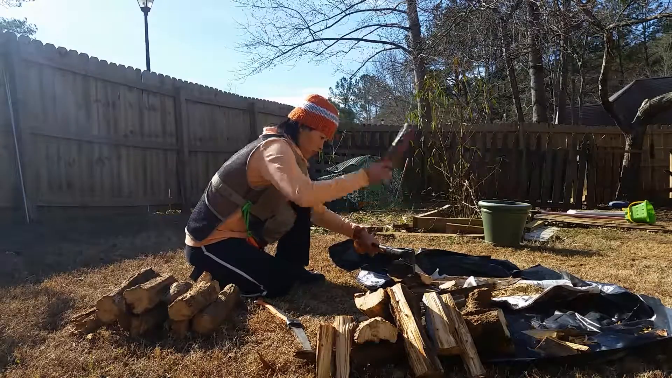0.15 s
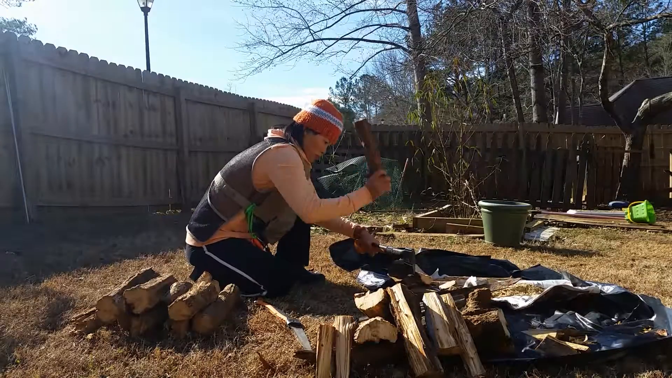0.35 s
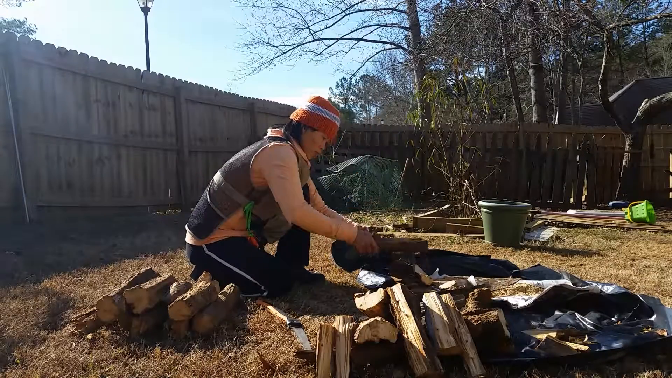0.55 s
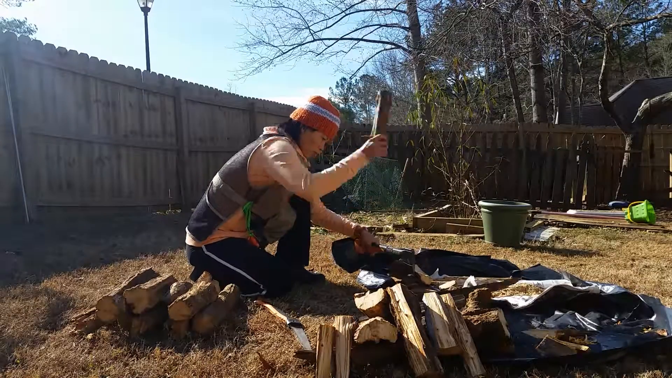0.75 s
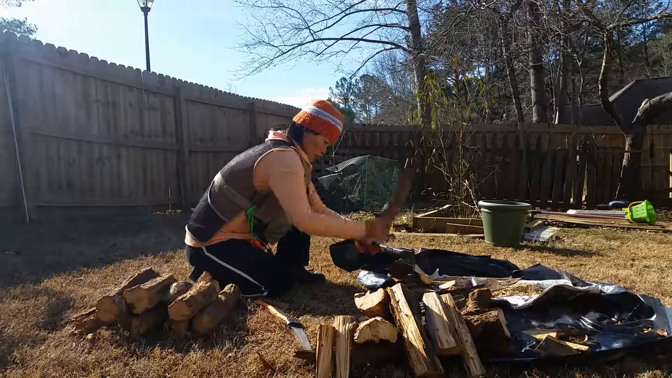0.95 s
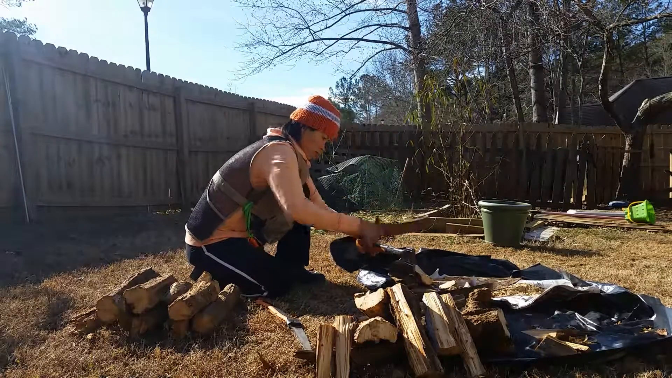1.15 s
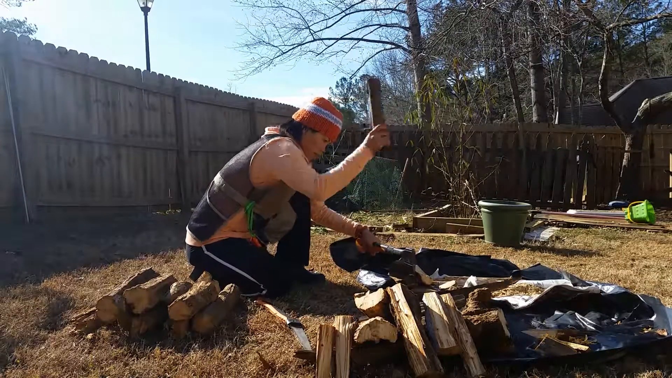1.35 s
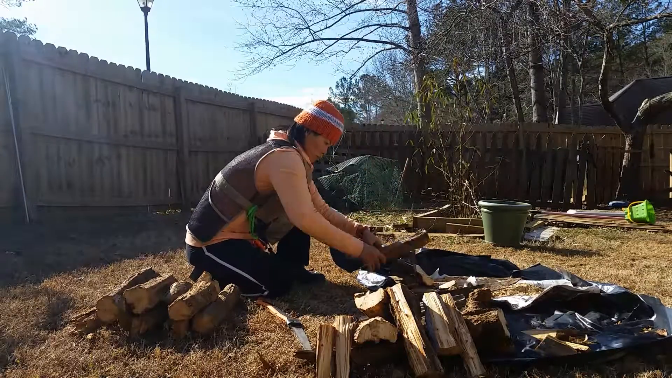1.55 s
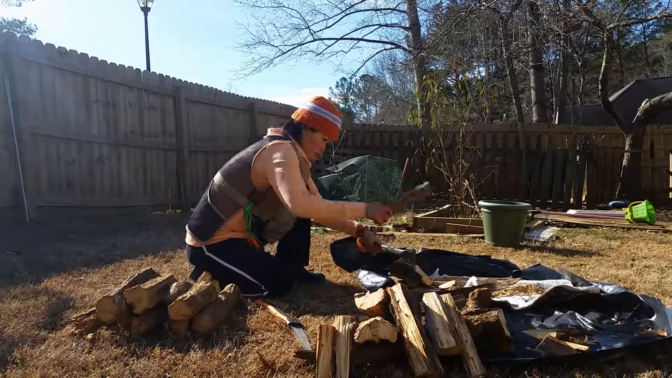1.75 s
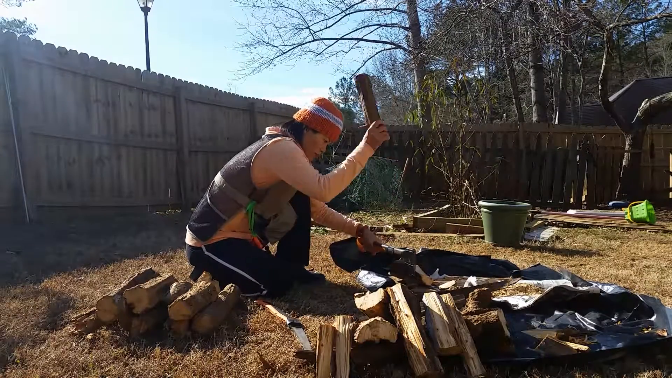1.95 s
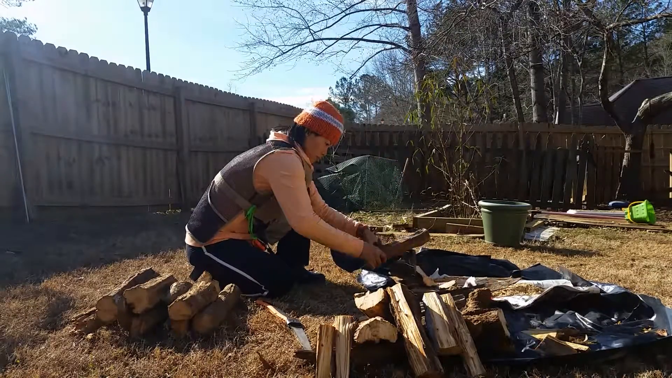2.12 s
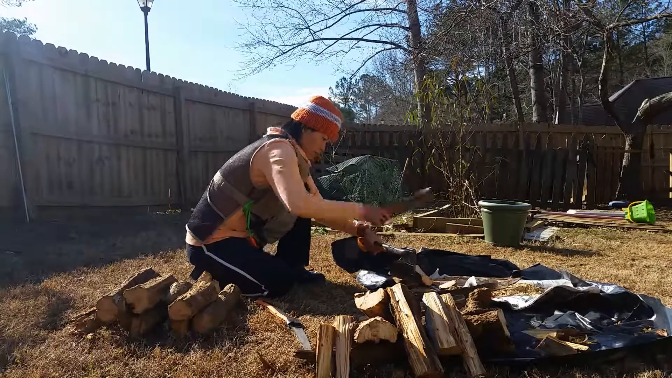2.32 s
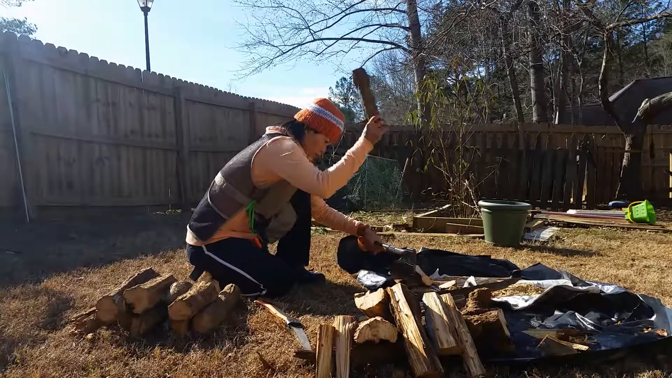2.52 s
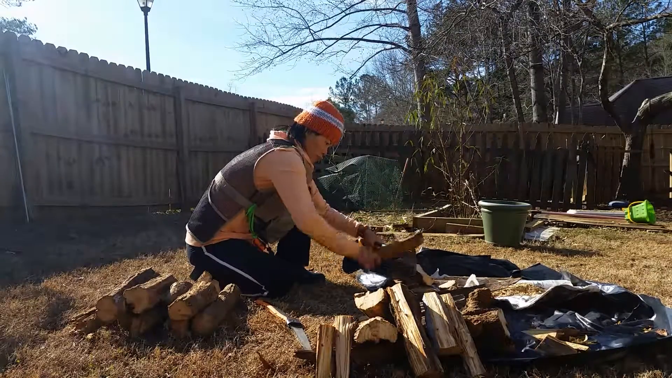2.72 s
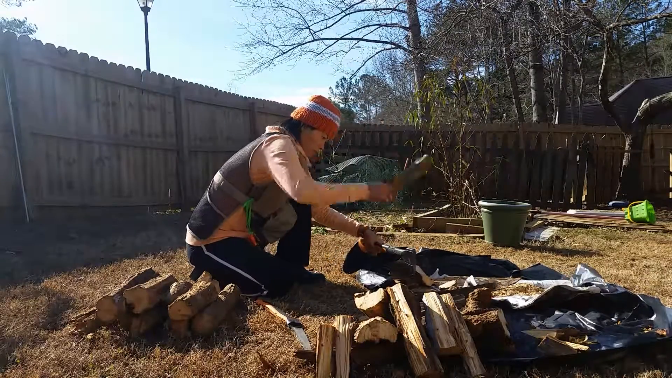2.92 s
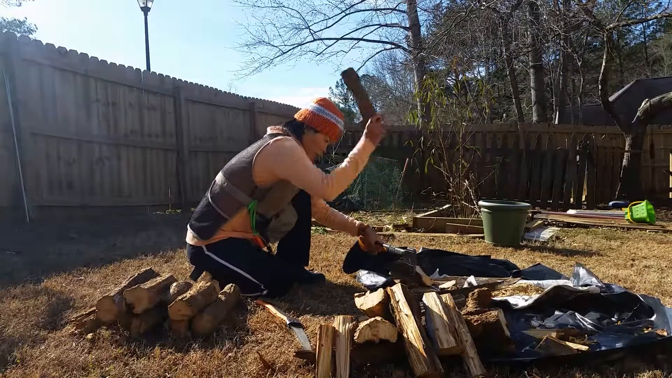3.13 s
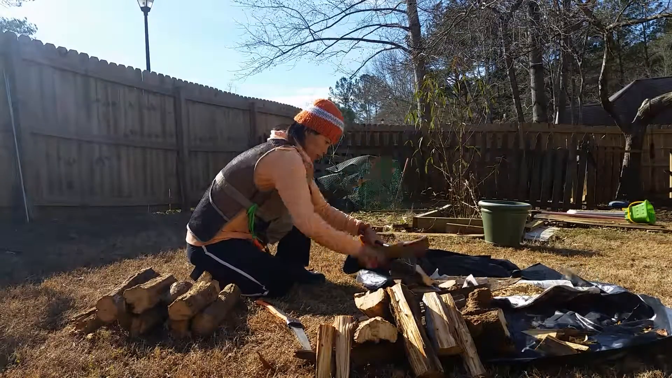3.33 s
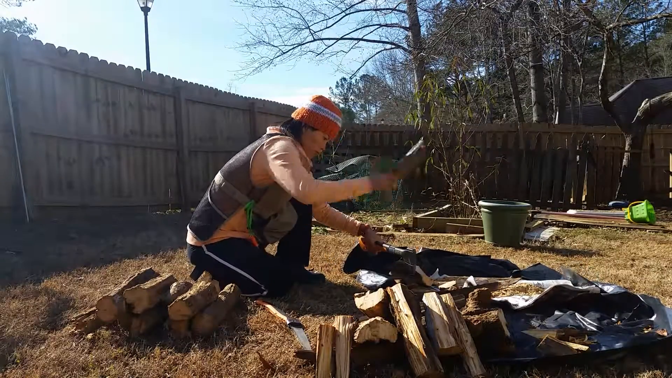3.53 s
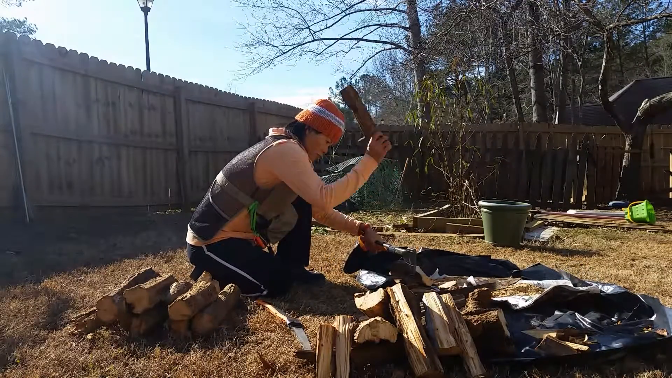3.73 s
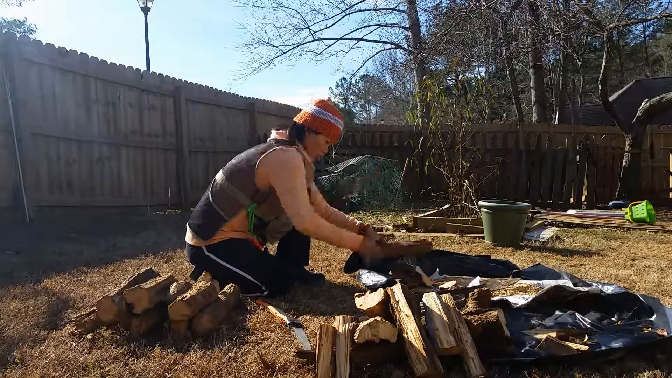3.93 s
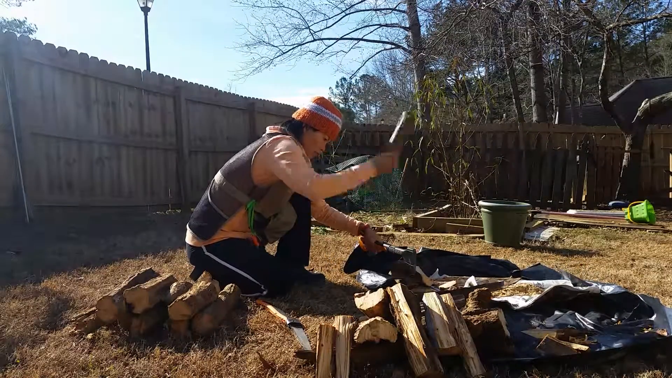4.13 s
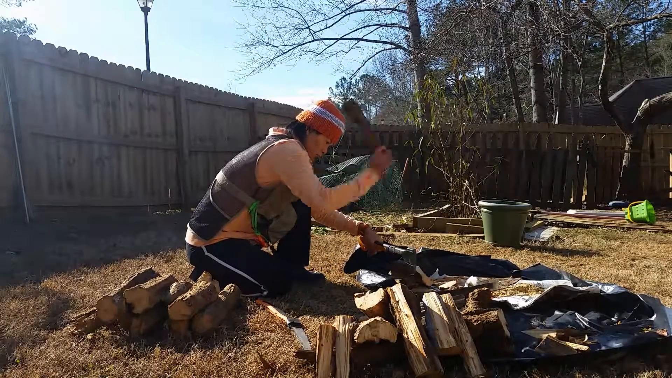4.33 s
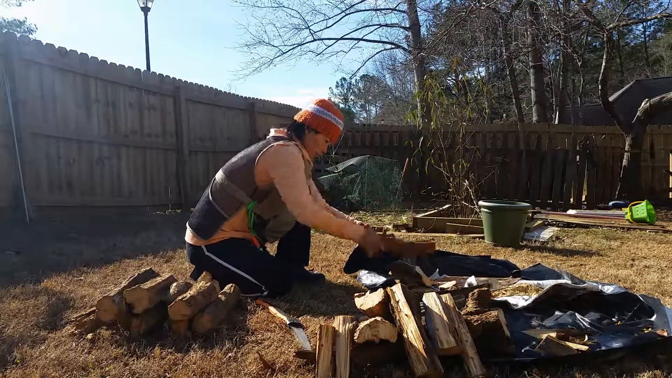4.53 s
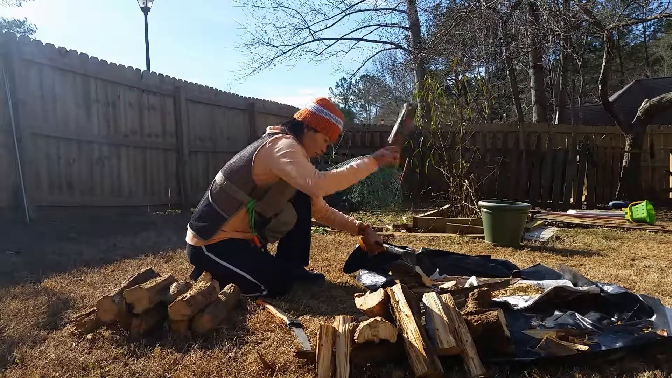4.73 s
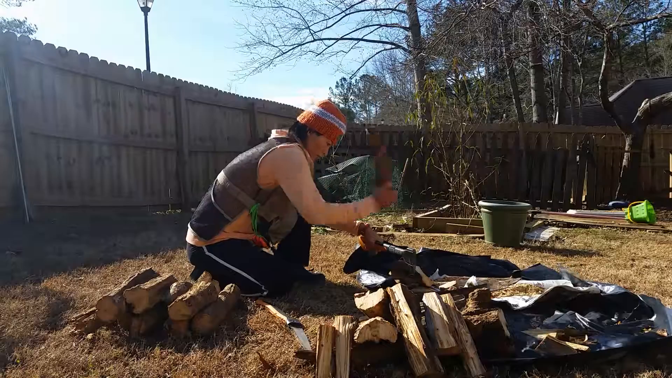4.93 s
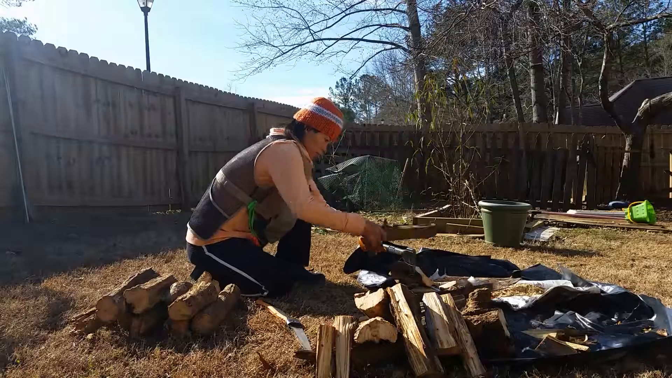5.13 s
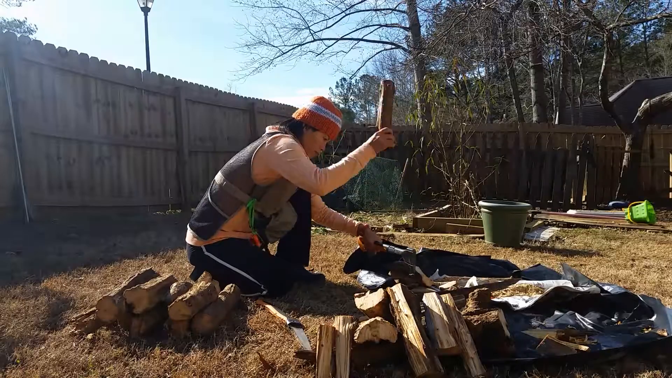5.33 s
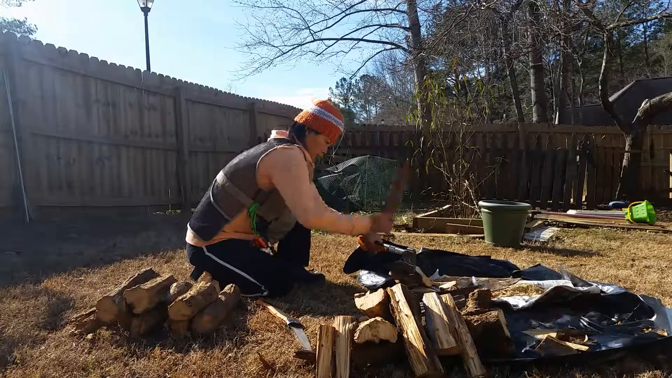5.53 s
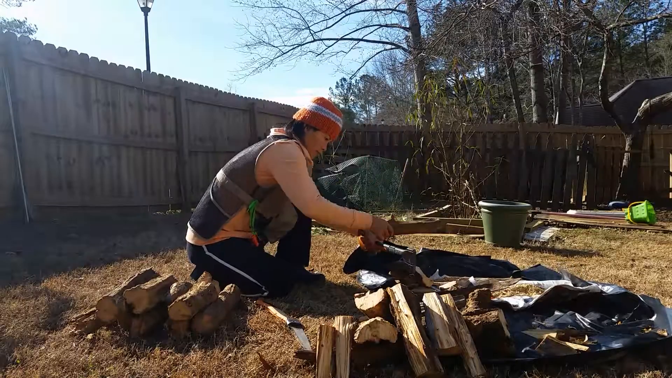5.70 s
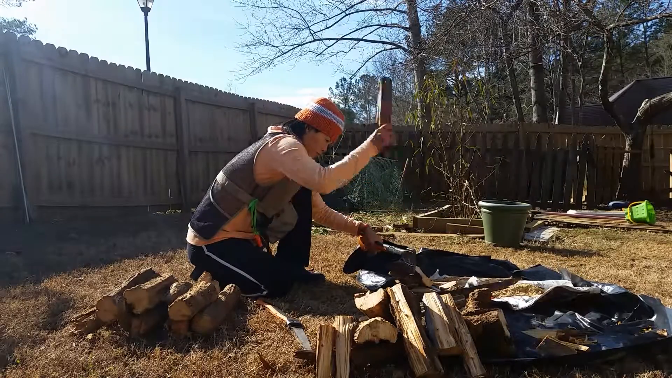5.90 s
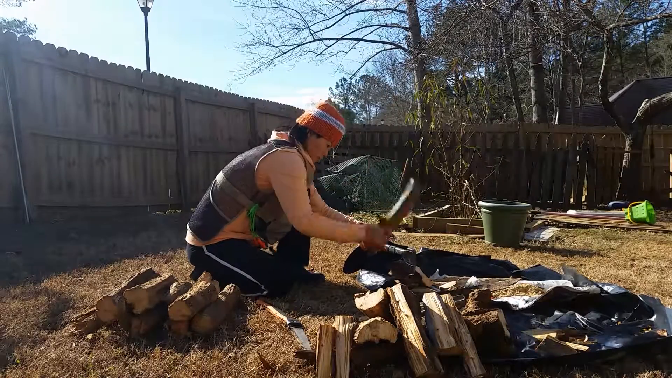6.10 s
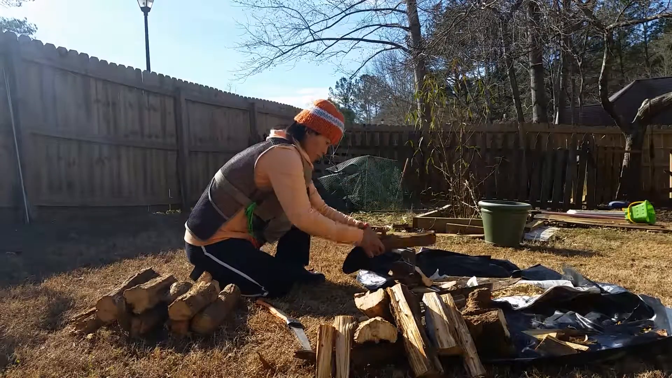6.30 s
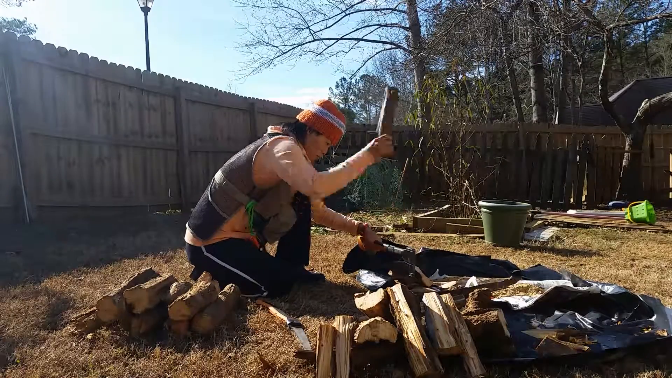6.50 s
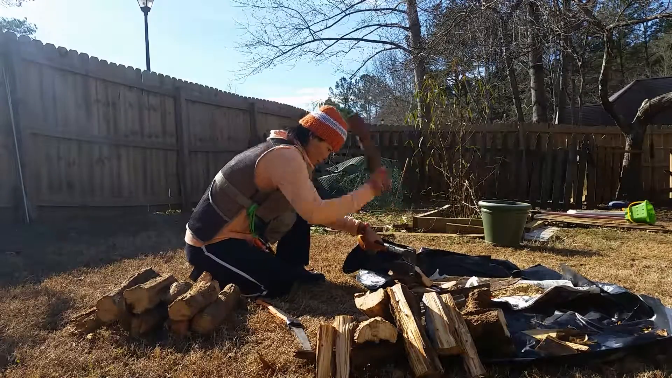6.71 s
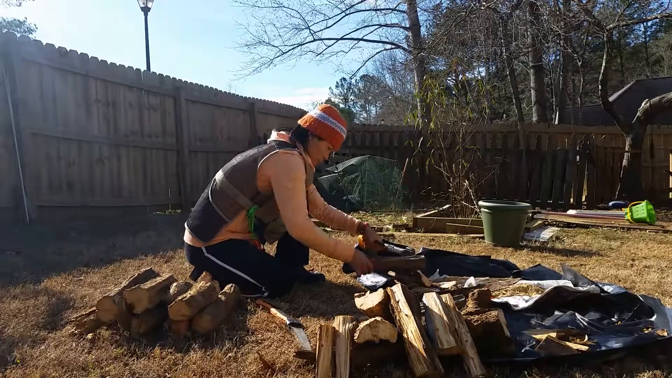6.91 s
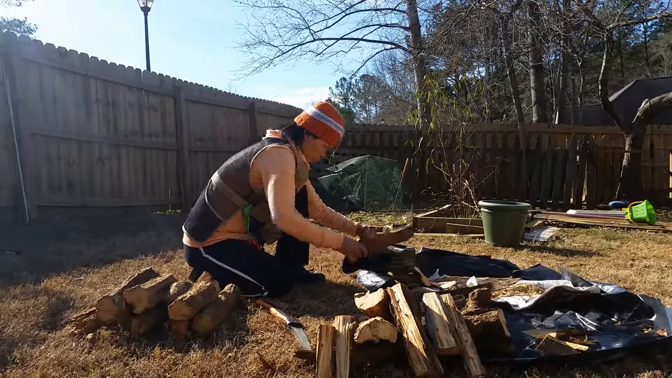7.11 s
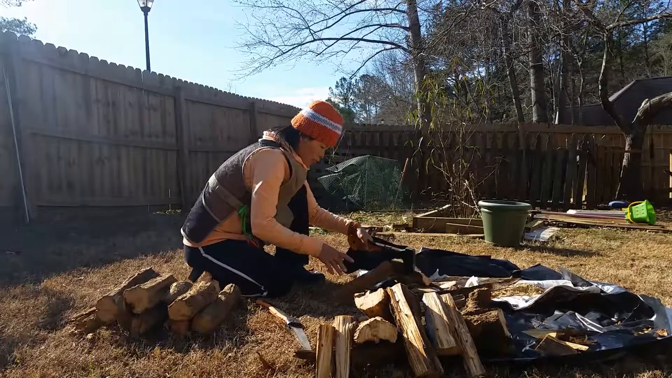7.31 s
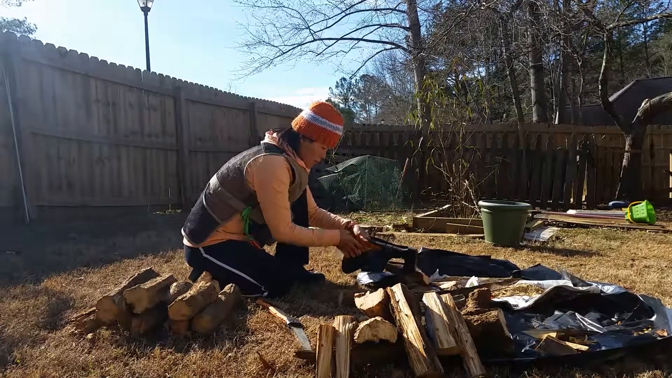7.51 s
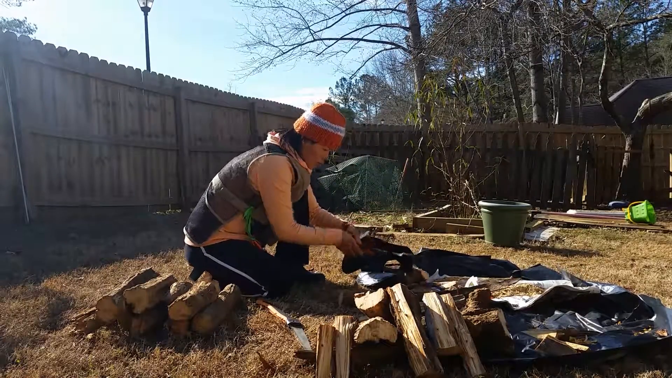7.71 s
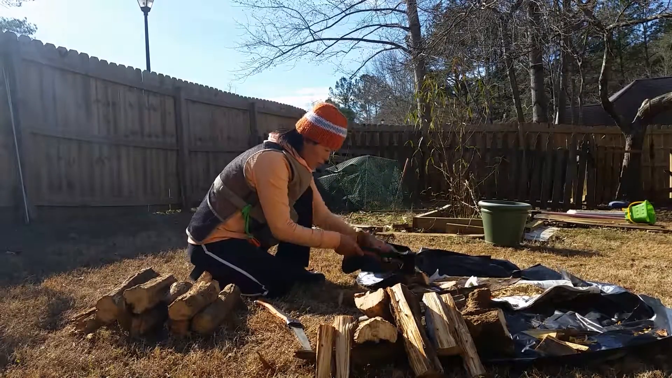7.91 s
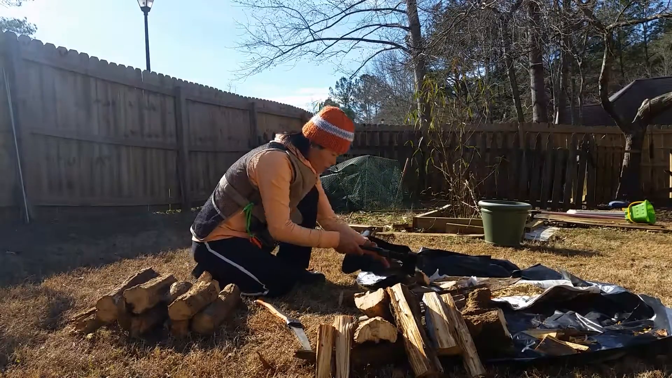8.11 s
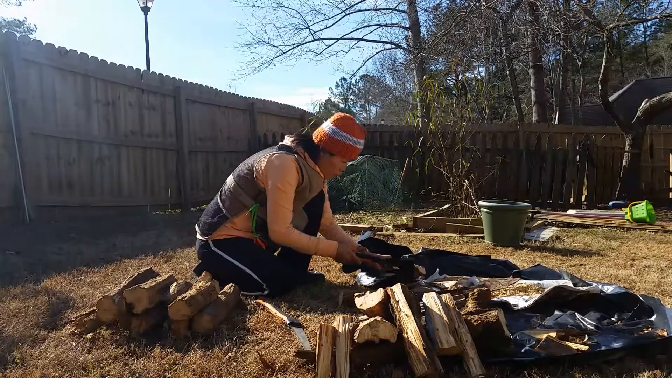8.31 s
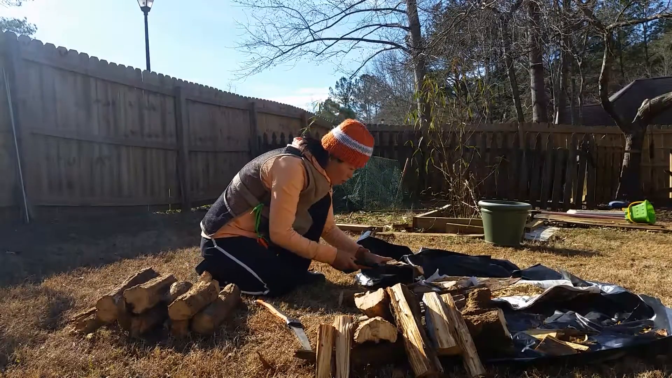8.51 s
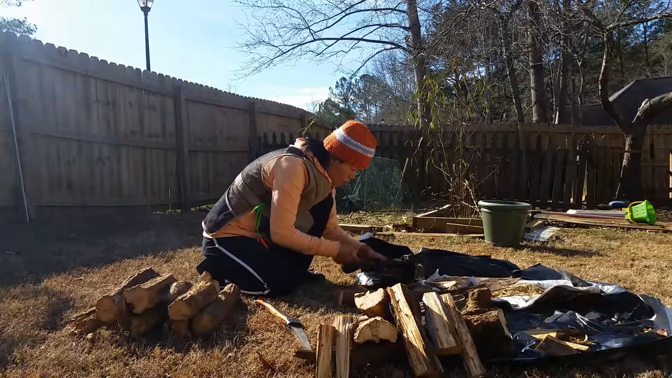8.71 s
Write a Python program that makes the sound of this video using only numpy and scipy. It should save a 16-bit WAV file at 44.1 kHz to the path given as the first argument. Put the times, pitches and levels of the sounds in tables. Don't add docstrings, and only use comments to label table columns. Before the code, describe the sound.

Quiet open air with faint traffic rumble, soft leaf hiss and a weak distant whine around 370 Hz that fades by 3 s. From 0.3 s a wooden club hits a blade in a log, twelve blows about 0.57 s apart, the last near 6.6 s. Each is a short, loud thud around 200 Hz with hollow woody knocks, a small blade click, crunching fibres and fast fence echoes within a tenth of a second, plus a faint late reply. Barely audible metal tinkles fall between blows; splinters tick near 3.8, 4.4 and 6.1 s. From 5.2 s a far motor hums low, surging from 6.3 s. After the blows, splinters are handled from 7 s; wood lands softly at 8 s and knocks lightly at 8.25 s as wind buffets and the breeze grows. Stereo, treble mostly left.

```python
import sys
import numpy as np
from scipy import signal
from scipy.fft import rfft, irfft, next_fast_len
from scipy.io import wavfile
from scipy.ndimage import map_coordinates

SR = 44100
rng = np.random.default_rng(int(sys.argv[2]) if len(sys.argv) > 2 else 0)


def ratio_of_db(decibels):
    return 10 ** (np.asarray(decibels, float) / 20)


def waveform_to_disk(signal):
    frames = np.transpose(np.atleast_2d(signal))
    scaled = np.clip(frames, -1, 1) * 32767
    samples = np.round(scaled).astype(np.int16)
    wavfile.write(sys.argv[1], SR, samples)


N = 385871
TAIL = 8192
TOP_HZ = 15600
STEADY_DB = 0.4

# [f/Hz, level/dB]
FAR_PORTS = [(60, 1), (200, 2), (450, 3), (800, 7), (1300, 8), (2700, 5.5), (3300, 7), (3900, 47.5),
             (4600, 51), (5600, 26), (6600, 0), (8000, -6), (10500, 5.5), (15000, 1.5)]
# [f/Hz, level/dB]
NEAR_PORTS = [(60, 1), (200, 2), (400, 5), (700, 6), (1500, 8), (2600, 10.5), (4000, 14), (5000, 29),
              (7500, 37), (10800, 22), (13000, 4), (15300, -4.5)]
# [f/Hz, correlation/1]
LIKENESS = [(30, 1), (70, 0.94), (130, 0.93), (290, 0.93), (640, 0.25), (1410, -0.48), (3100, -0.21),
            (15000, 0.19)]

# [t/s, level/dB]
TRAFFIC = [(0, -62.5), (1.2, -60.5), (2.0, -62.5), (2.53, -58), (2.95, -64), (4.0, -64), (4.3, -59.5),
           (4.85, -69.5), (5.4, -67.5), (5.8, -64.5), (6.3, -62.5), (7.0, -57.5), (7.6, -54), (8.2, -57.5),
           (8.75, -59.5)]
# [f/Hz, density/dB per Hz]
RUMBLE = [(12, -49), (20, -27.5), (59, -5), (107, -2), (176, -9), (200, -14.5), (231, -17), (300, -26.5),
          (390, -42.5), (660, -120)]
# [f/Hz, density/dB per Hz]
ROAR = [(150, -25.5), (250, 2), (331, -4), (367, 0), (476, -7.5), (917, -13), (1690, -25.5), (3000, -47.5),
        (3900, -78.5), (6600, -120)]
USUAL_TRAFFIC_DB, RUMBLE_DB, RUMBLE_DB_PER_DB = -60, -42.5, 0.54

# [t/s, level/dB]
BREEZE = [(0, -66), (.6, -62), (1.15, -61.5), (2.5, -61.5), (2.95, -66.5), (4.0, -67), (4.3, -63.5),
          (4.85, -72), (5.7, -71), (5.95, -64), (6.3, -63), (6.6, -66.5), (6.9, -60.5), (7.5, -57.5),
          (8.3, -53.5), (8.75, -53.5)]
# [f/Hz, density/dB per Hz]
LEAF_HISS = [(1650, -60.5), (2800, -26.5), (3150, -22.5), (3820, -3), (4470, 3.5), (5580, -14.5),
             (5870, -19), (6560, -39.5), (7000, -47.5), (9100, -61.5), (15400, -120)]
# [f/Hz, density/dB per Hz]
AIR = [(6000, -0.5), (7000, -35.5), (9000, -22), (9700, -12), (10600, 3.5), (12200, -8), (14000, 4.5),
       (15500, -4.5)]
# [f/Hz, density/dB per Hz]
BOUGHS = [(100, -82), (250, -19.5), (500, 4.5), (900, 1), (1600, -11), (2500, -25), (3500, -47),
          (6000, -110)]
USUAL_BREEZE_DB = -65
AIR_DB, AIR_DB_PER_DB = -86, 1.3
BOUGHS_DB, BOUGHS_DB_PER_DB = -69.5, 1.4

# [t/s, f/Hz, level/dB]
WHINE = [(0, 362, -60), (.7, 369, -66), (1.3, 372, -66), (1.9, 379, -63.5), (2.5, 383, -57.5),
         (2.9, 385, -64.5), (3.2, 386, -88.5)]

# [t/s, level/dB, half length/s]
GUSTS = [
    (1.206, -49, 0.13),
    (3.824, -52.5, .08),
    (6.987, -49.5, 0.28),
    (7.73, -49, 0.073),
    (7.95, -40.5, 0.19),
]
# [f/Hz, density/dB per Hz]
BUFFET = [(8, -40), (22, -6.5), (40, -1.5), (65, 10), (100, 7.5), (200, -42), (500, -110)]
CALM_DB = -58

# [t/s, peak/dB, L-R/dB, t60/s]
TICKS = [(.0933, -74, 9, .02), (.6459, -72, 6, 0.044), (3.4865, -65, 9, .012), (3.8284, -49.5, 14, 0.01),
         (4.3893, -41, 11, 0.012), (6.1157, -44.5, 9, .012), (6.6058, -74, 19, 0.054),
         (7.067, -64, 20, .015), (7.256, -53.5, 12, 0.14), (7.3711, -60, 15, .04), (7.4415, -52, 10, 0.017),
         (7.6181, -49, -4, 0.016), (7.629, -68, 11, .04), (8.0794, -67, 7, .04), (8.1894, -59, 13, 0.044),
         (8.2500, -58, 8, .03), (8.5350, -71, 8.5, .03), (8.6000, -66, 13, 0.47)]
# [f/Hz, level/dB]
SPLINTER = [(1000, -9), (2500, 3), (4000, -12.5), (7500, -24.5), (9200, -10.5), (10500, -1), (15300, -10),
            (16000, -28)]

# [t/s, thud/dB; re thud: squareness of hit/dB, splitting of grain/dB, bite of blade/dB]
BLOWS = [(0.296, -10.5, -7.5, -16.5, -18.5), (0.856, -10, -5, -14.5, -14.5), (1.416, -10.5, -6, -13, -17),
         (1.991, -7.5, -9.5, -17.5, -19), (2.563, -11, -10.5, -13.5, -25), (3.143, -11, -13, -16.5, -29),
         (3.71, -9, -13, -21.5, -26.5), (4.283, -12.5, -12.5, -15, -30.5), (4.854, -13.5, -15, -17, -29.5),
         (5.429, -10, -15, -22, -31.5), (5.985, -14, -9, -10.5, -20), (6.631, -7.5, -12, -16, -22.5)]
# [f/Hz, level/dB, t60/s]
THUD_MODES = [(-74, -3.5, 0.031), (207.5, -5.5, 0.075), (234, 3.5, 0.046), (316, -10.5, 0.068)]
# [f/Hz, level/dB, t60/s]
KNOCK_MODES = [(461.2, 8, 0.034), (496, 4, 0.046), (568, -3, 0.06), (643, 17, 0.016), (698, 10, 0.031),
               (842.7, 2, 0.071), (915, 0.5, 0.038), (997, -4, 0.044), (1186, -19.5, 0.088)]
# [f/Hz, level/dB, t60/s]
CLUB_MODES = [(1200, -14.5, .02), (1368, -1, 0.0089), (1490, -9.5, 0.067), (1556, -9, 0.042),
              (1595, 5.5, 0.042), (1655, -7.5, 0.04), (1720, -16, .02), (1980, -14, 0.035),
              (2266, -14, 0.029)]
# [f/Hz, level/dB, t60/s]
BLADE_MODES = [(3862, 6, 0.01), (4140, -0.5, 0.018), (4770, -8, 0.013), (4830, -2.5, 0.018),
               (5380, -7, .015)]
# [f/Hz, level/dB]
GRAIN = [(150, -21.5), (300, 0.5), (680, 4.5), (1100, -6.5), (1700, -7.5), (2400, -31), (3200, -33),
         (6000, -54.5)]
# [f/Hz, density/dB per Hz]
CRACK = [(1180, -38), (2000, -8), (2160, 3), (2510, -12.5), (3020, -16), (4030, -2), (7300, -33),
         (10000, -69.5)]
# [f/Hz, density/dB per Hz]
SPRAY = [(5000, -46.5), (7300, -25.5), (8700, -18), (10600, 3), (12400, -5), (14000, 3), (15500, 4),
         (16200, -13.5)]
LAG_S = 0.000495
MODE_SPREAD_DB, DETUNE, CONTACT_S = 1.2, 0.006, 0.003
LOW_KNOCK_DB, USUAL_SPLIT_DB, USUAL_BITE_DB = -12, -16, -23
CLUB_DB, CLUB_DB_PER_DB = -14.5, 0.83
GRAIN_DB, GRAIN_DB_PER_DB = -8.5, 1.1
CRACK_DB, CRACK_DB_PER_DB, CRACK_DB_PER_BITE_DB = -30, 0.81, 0.29
SPRAY_DB, SPRAY_DB_PER_DB = -38, 1.34

# [t/s, level/dB, L-R/dB]
ECHOES = [
    (.030, -12, -1),
    (0.0413, -9.5, 3.5),
    (0.073, -25.5, 7),
    (0.1, -34, 18),
]
# [f/Hz, level/dB]
BOARDS = [(100, -38), (300, -8.5), (800, -8.5), (1600, -2.5), (4000, -7.5), (9000, 3), (15000, 0.5)]
# [t/s, level/dB]
PANELS = [(.0198, -16), (.0395, -21), (.0483, -16), (.0728, -25), (.0822, -24), (.0949, -21), (.104, -24)]
# [f/Hz, level/dB]
PANEL_COLOUR = [(60, -4.5), (150, -2), (300, -1), (600, -13.5), (1200, -6.5), (1700, -7.5), (2500, -30.5),
                (6000, -51)]
# [f/Hz, level/dB]
YARD = [(30, -26.5), (90, 0.5), (220, -9.5), (330, -4.5), (500, -6.5), (900, -12.5), (1600, -3),
        (2600, -2.5), (15000, 2.5)]
# [f/Hz, level/dB]
FAR = [(200, -22.5), (800, -2.5), (1600, -4), (3000, -2.5), (6000, -33)]
YARD_DB, YARD_T60_S = -7.5, 0.38
FAR_DB, FAR_T60_S, FAR_WALL_S = -22.5, 4.1, 0.61

# [t/s, level/dB]
TAG = [(0.579, -69), (1.1533, -68), (1.925, -64), (2.3126, -78), (2.5013, -65), (2.6868, -61), (3.401, -66),
       (3.9923, -64.5), (4.4313, -66), (5.7897, -74), (6.2986, -77), (6.4444, -83)]
# [f/Hz, level/dB, t60/s]
TAG_MODES = [(7300, -19, .02), (9450, -5, .025), (10840, -3, 0.03), (11100, -8, .015), (13600, -12, .012)]

# [t/s, level/dB, f/Hz, t60/s]
TAPS = [
    (3.828, -35.5, 46.8, 0.32),
    (7.987, -20.5, 96, 0.049),
    (8.013, -21.5, 150, 0.016),
    (8.247, -30.5, 477, 0.064),
]

# [t/s, hold/s, level/dB, f/Hz]
SURGES = [
    (6.3, 0.78, -38.5, 105.6),
    (7.356, .1, -37.5, 106),
    (7.647, 0.15, -38.5, 106.2),
    (8.33, .07, -42.5, 103.3),
    (8.66, 0.13, -37.5, 114.6),
]
MOTOR_ON_S, IDLE_DB, IDLE_HZ = 5.2, -53, 106
SURGE_RISE_S, SURGE_FALL_S = 0.053, 0.07

SELF_NOISE_DB = -92


def rms_one(x):
    return x / np.sqrt(np.mean(x ** 2) + 1e-20)


def in_time(rows):
    s, *columns = np.transpose(rows)
    return [np.interp(np.arange(N) / SR, s, c) for c in columns]


def at_hz(points, hz):
    points_hz, values = np.transpose(points)
    return np.interp(np.log(hz + 1), np.log(points_hz), values)


def causal(x, db_of_hz):
    size = 2 * next_fast_len(x.shape[-1] // 2 + 4096)
    cepstrum = irfft(db_of_hz(np.fft.rfftfreq(size, 1 / SR)) * np.log(10) / 20, size)
    cepstrum[..., 1:size // 2] *= 2
    cepstrum[..., size // 2 + 1:] = 0
    response = np.exp(rfft(cepstrum))
    return irfft(rfft(x, size) * response, size)[..., :x.shape[-1]]


def ports(x, balance):
    def gains_db(hz):
        right = ratio_of_db(-at_hz(balance, hz))
        return 20 * np.log10(np.array([2 / (1 + right), 2 * right / (1 + right)]))
    return causal(x, gains_db)


def drift(rate_hz):
    knots = rng.standard_normal(int(N / SR * 40) + 4)
    return map_coordinates(knots, [np.arange(N) / SR * min(rate_hz, 39)], order=3)


def pair(length):
    mid, side = rfft(rng.standard_normal((2, length)))
    alike = np.clip(at_hz(LIKENESS, np.fft.rfftfreq(length, 1 / SR)), -0.99, 0.99)
    mid = np.sqrt((1 + alike) / 2) * mid
    side = np.sqrt((1 - alike) / 2) * side
    return irfft(mid + side * [[1], [-1]], length)


def rings(modes, spread_db, detune, contact_s=0.0001):
    t = np.arange(TAIL) / SR
    chance = rng.standard_normal((len(modes), 2))
    out = np.zeros(TAIL)
    for (hz, db, t60_s), (a, b) in zip(modes, chance):
        decay = ratio_of_db(db + spread_db * a - 60 * t / t60_s)
        out += decay * np.sin(2 * np.pi * hz * (1 + detune * b) * (t - LAG_S))
    return (1 - np.exp(-t / contact_s)) * out


def burst(t60_s, colour, rise_s=0.000067):
    t = np.arange(TAIL) / SR
    hz = np.fft.rfftfreq(TAIL, 1 / SR)
    puff = rms_one(irfft(rfft(pair(TAIL)) * ratio_of_db(at_hz(colour, hz)), TAIL))
    return puff * (1 - np.exp(-t / rise_s)) * ratio_of_db(-60 * t / max(t60_s, 0.004))


def add(out, s, sound):
    at = round(s * SR)
    out[..., at:at + sound.shape[-1]] += sound[..., :N - at]


def bed(spectrum, level_db, patchy_db, rate_hz):
    size = next_fast_len(N)
    hz = np.fft.rfftfreq(size, 1 / SR)
    noise = irfft(rfft(pair(size)) * ratio_of_db(at_hz(spectrum, hz)) * (hz < TOP_HZ), size)[:, :N]
    return rms_one(noise) * ratio_of_db(level_db + patchy_db * drift(rate_hz))


def traffic():
    level_db, = in_time(TRAFFIC)
    rumble_db = RUMBLE_DB + RUMBLE_DB_PER_DB * (level_db - USUAL_TRAFFIC_DB)
    rumble = bed(RUMBLE, rumble_db, patchy_db=1.65, rate_hz=6.2)
    return rumble + bed(ROAR, level_db + 4.0, STEADY_DB, rate_hz=12)


def trees():
    level_db, = in_time(BREEZE)
    more_db = level_db - USUAL_BREEZE_DB
    leaves = bed(LEAF_HISS, level_db - 1.5, patchy_db=0.7, rate_hz=7)
    air = bed(AIR, AIR_DB + AIR_DB_PER_DB * more_db, STEADY_DB, rate_hz=7)
    boughs = bed(BOUGHS, BOUGHS_DB + BOUGHS_DB_PER_DB * more_db, STEADY_DB, rate_hz=7)
    return leaves + air + boughs


def whine():
    hz, db = in_time(WHINE)
    on = np.clip((np.arange(N) / SR - WHINE[0][0]) / 0.26, 0, 1)
    level = on * ratio_of_db(db + 2 * drift(2.2))
    return np.sqrt(2) * level * np.sin(2 * np.pi * np.cumsum(hz) / SR)


def wind():
    t = np.arange(N) / SR
    level = ratio_of_db(CALM_DB) + sum(ratio_of_db(db) * np.exp(-((t - s) / half_s) ** 2) for s, db, half_s in GUSTS)
    both, left, right = rng.standard_normal((3, N))
    noise = causal(np.array([both + 0.8 * left, both + 0.8 * right]), lambda hz: at_hz(BUFFET, hz))
    return rms_one(noise) * level * ratio_of_db(1.5 * drift(9))


def splinters():
    out = np.zeros((2, N))
    for s, db, pan_db, t60_s in TICKS:
        side_db = np.array([[pan_db - 7], [7 - pan_db]]) / 2
        add(out, s, ratio_of_db(db - 7.0 + side_db) * burst(t60_s, SPLINTER, rise_s=t60_s / 30))
    return out


def log_rings(square_db):
    thud = rings(THUD_MODES, 0.8, 0.006, CONTACT_S)
    low = ratio_of_db(LOW_KNOCK_DB) * rings(KNOCK_MODES[:3], MODE_SPREAD_DB, DETUNE, CONTACT_S)
    high = ratio_of_db(square_db - 2.0) * rings(KNOCK_MODES[3:], MODE_SPREAD_DB, DETUNE, CONTACT_S)
    return thud + low + high


def splitting(more_db, bite_db):
    grain = ratio_of_db(GRAIN_DB + GRAIN_DB_PER_DB * more_db) * burst(0.083, GRAIN, rise_s=0.0063)
    crack_db = CRACK_DB + CRACK_DB_PER_DB * more_db + CRACK_DB_PER_BITE_DB * (bite_db - USUAL_BITE_DB)
    crack = ratio_of_db(crack_db) * (burst(0.055, CRACK) + ratio_of_db(4) * burst(0.0027, CRACK))
    spray_db = SPRAY_DB + SPRAY_DB_PER_DB * more_db
    spray = ratio_of_db(spray_db) * (burst(0.069, SPRAY) + ratio_of_db(10.5) * burst(0.003, SPRAY))
    return grain + crack + spray


def blows():
    out = np.zeros((2, N))
    for s, thud_db, square_db, split_db, bite_db in BLOWS:
        more_db = split_db - USUAL_SPLIT_DB
        log = log_rings(square_db)
        club = ratio_of_db(CLUB_DB + CLUB_DB_PER_DB * more_db) * rings(CLUB_MODES, MODE_SPREAD_DB, DETUNE, CONTACT_S)
        blade = ratio_of_db(bite_db - 2.0) * rings(BLADE_MODES, MODE_SPREAD_DB, DETUNE * 2, contact_s=0.0015)
        add(out, s - 0.0004, ratio_of_db(thud_db) * (club + blade - log + splitting(more_db, bite_db)))
    return yard(out)


def yard(x):
    t = np.arange(3 * TAIL) / SR

    def reflections(shape, db):
        noise = pair(3 * TAIL) * shape
        return noise / np.sqrt(np.sum(noise ** 2) / 2) * ratio_of_db(db)

    swell = np.clip((t - 0.006) / 0.037, 0, 1)
    scatter = reflections(swell * ratio_of_db(-60 * t / YARD_T60_S), YARD_DB)
    mirror = np.zeros((2, len(t)))
    for s, db, pan_db in ECHOES:
        smear = ratio_of_db(-60 * np.abs(t - s) / 0.015) * (t >= s)
        mirror += reflections(smear, db + np.array([[pan_db], [-pan_db]]) / 2)
    wall = 2.5 * ratio_of_db(-60 * np.abs(t - FAR_WALL_S) / 0.15) * (t >= FAR_WALL_S)
    fade = np.cos(np.pi / 2 * t / t[-1])
    late = reflections((swell + wall) * ratio_of_db(-60 * t / FAR_T60_S) * fade, FAR_DB)
    solid = np.zeros((2, len(t)))
    for s, db in PANELS:
        solid[:, round(s * SR)] = ratio_of_db(db)

    reply = np.zeros((2, len(t)))
    for part, colour in ((scatter, YARD), (mirror, BOARDS), (late, FAR), (solid, PANEL_COLOUR)):
        reply += causal(part, lambda hz: at_hz(colour, hz) - 40 * (hz > TOP_HZ))
    reply[:, 0] += 1
    return signal.fftconvolve(x, reply, axes=1)[:, :N]


def zip_tag():
    out = np.zeros((2, N))
    for s, db in TAG:
        add(out, s, ratio_of_db(db) * rings(TAG_MODES, 1.5, 0.006) * ratio_of_db([[1.5], [-4]]))
    return out


def wood_taps():
    out = np.zeros((2, N))
    for s, db, hz, t60_s in TAPS:
        add(out, s, rings([(hz, db, t60_s)], 0, 0, contact_s=0.0007))
        if hz > 200:
            add(out, s, ratio_of_db(db - 14) * burst(0.02, GRAIN))
    return out


def motor():
    t = np.arange(N) / SR
    level = ratio_of_db(IDLE_DB) * np.clip((t - MOTOR_ON_S) / 0.69, 0, 1)
    hz = np.full(N, float(IDLE_HZ))
    for s, hold_s, db, surge_hz in SURGES:
        rise = 1 + (t - s) / SURGE_RISE_S
        fall = 1 + (s + hold_s - t) / SURGE_FALL_S
        load = np.clip(np.minimum(rise, fall), 0, 1)
        level = level + load * (ratio_of_db(db) - level)
        hz = hz + load * (surge_hz - hz)
    phase = 2 * np.pi * np.cumsum(hz * (1 + 0.011 * drift(4))) / SR
    return np.sqrt(2) * level * ratio_of_db(0.94 * drift(3.6)) * np.sin(phase)


def scene():
    far = traffic() + trees() + whine() + motor()
    near = splinters() + blows() + zip_tag() + wood_taps()
    return ports(far, FAR_PORTS) + ports(near, NEAR_PORTS) + wind()


def low_pass(x):
    return signal.sosfilt(signal.butter(12, 16710, fs=SR, output="sos"), x)


def record(dry):
    mix = np.array([np.roll(dry[0], 2), dry[1]])
    mix = mix + ratio_of_db(SELF_NOISE_DB) * rng.standard_normal(mix.shape)
    mix = signal.sosfilt(signal.cheby2(10, 50, TOP_HZ + 900, fs=SR, output="sos"), mix)
    return low_pass(mix)


dry = scene()
out = record(dry)
waveform_to_disk(out)
```